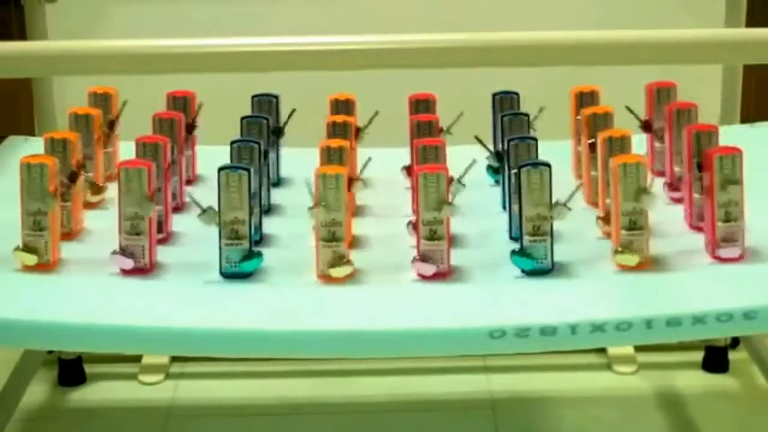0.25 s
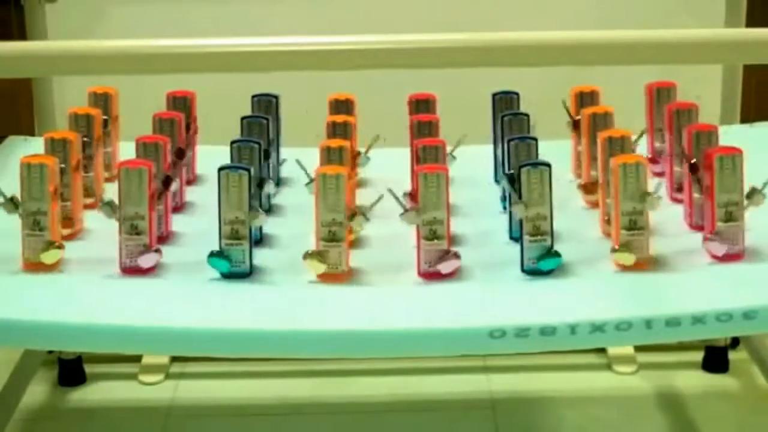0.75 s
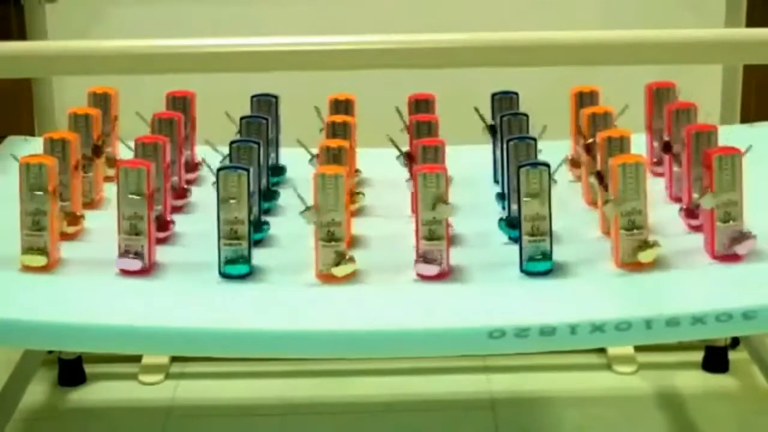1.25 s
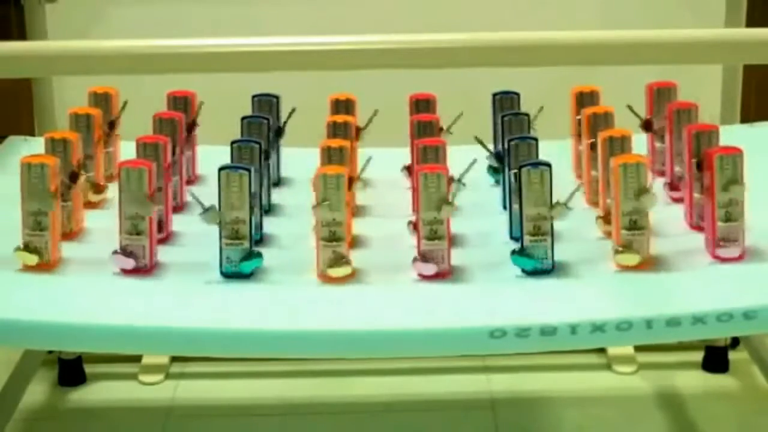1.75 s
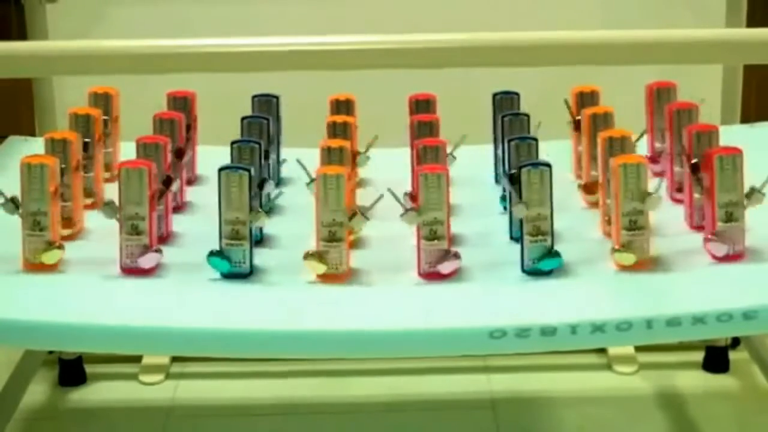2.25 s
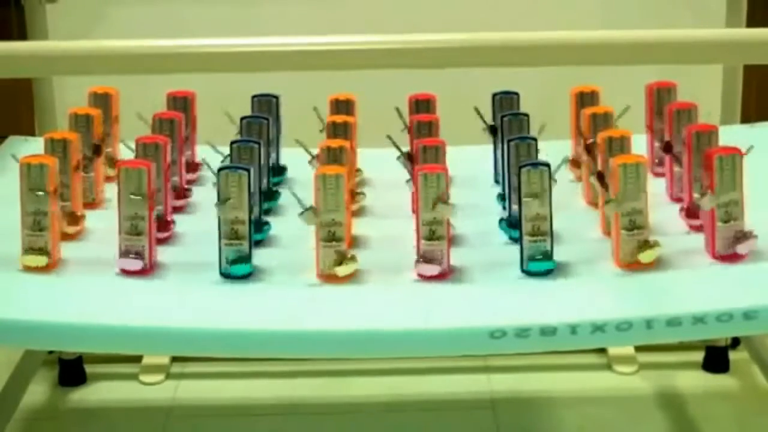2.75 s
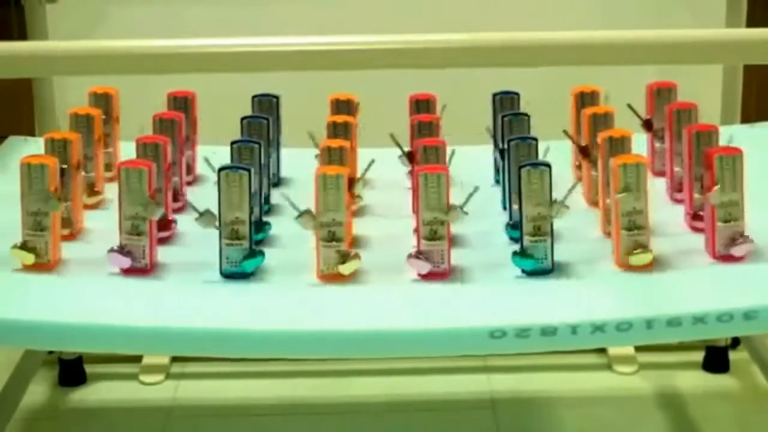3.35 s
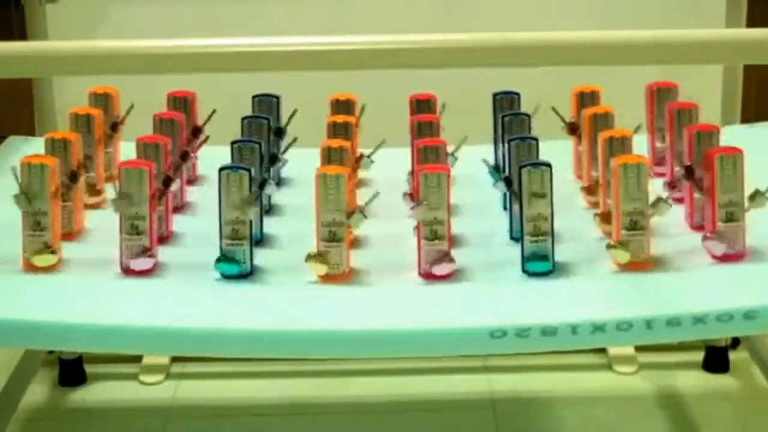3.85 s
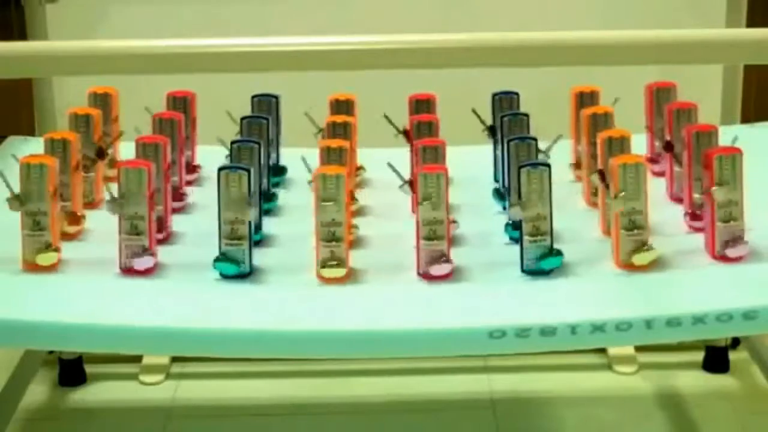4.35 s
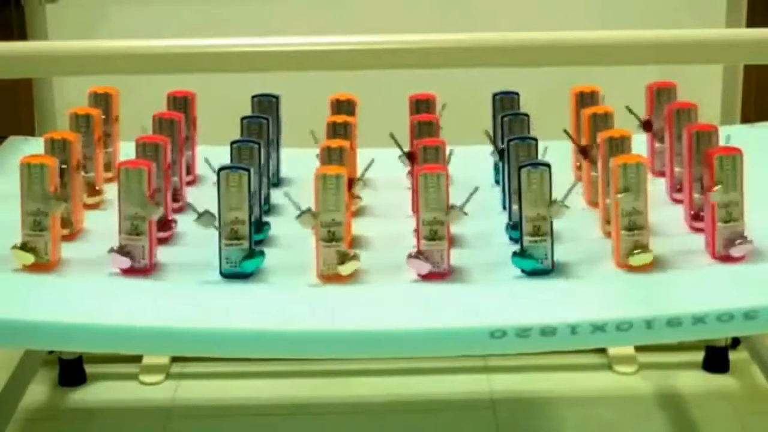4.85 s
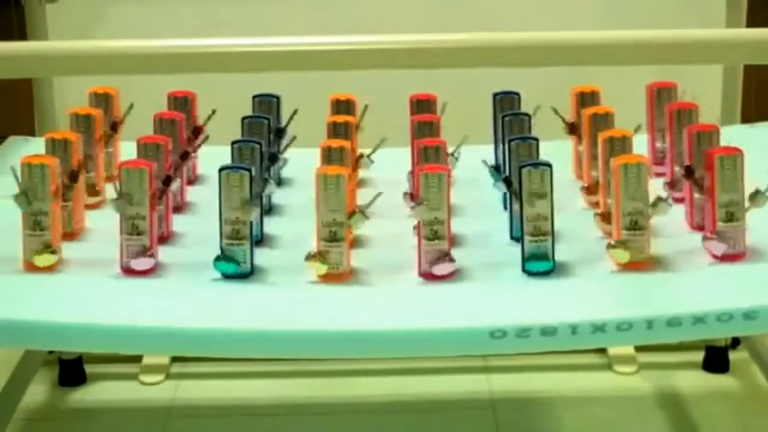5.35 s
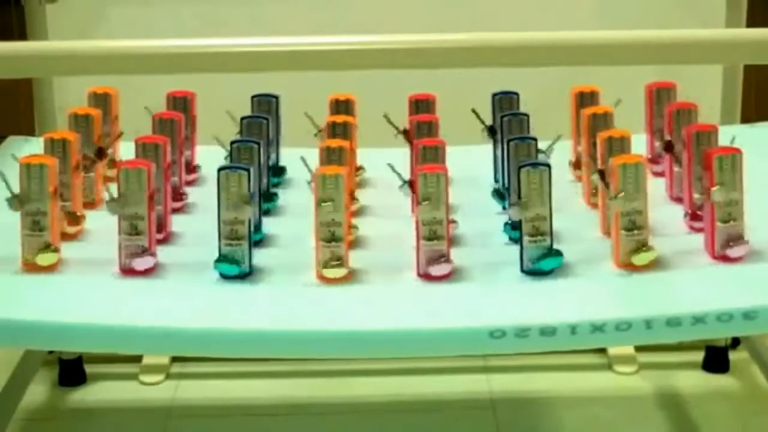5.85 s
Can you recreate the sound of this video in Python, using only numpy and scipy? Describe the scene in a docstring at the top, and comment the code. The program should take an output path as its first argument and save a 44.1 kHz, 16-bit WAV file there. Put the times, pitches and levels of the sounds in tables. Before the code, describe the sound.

From 0 s a dense clatter of thirty-two small clockwork metronomes is in full flow, and it continues unbroken to about 6 s. Each metronome strikes roughly every 0.38 s with a slight limp between tick and tock, but all are out of step, so some eighty-five ticks a second pile into an irregular rattle. Every tick is a dry, bright crack with a tiny rebound, a very short plastic ring near 1.9 kHz and a dull knock into the foam board. Louder ticks jump out at random; a few sound lower. Loose bunches slide and reshuffle throughout, never locking together. Beneath, the board hums hollowly around 200 to 600 Hz, its knocks swelling gently about every 0.38 s. Short small-room echoes fill the gaps. The stereo sound is close, mostly central, peak-limited, without deep bass or extreme treble.

```python
"""Thirty-two small clockwork metronomes tick out of step on a hanging foam board in a small room.
Each strikes twice a swing, with a slight limp: a sharp crack of filtered noise and clicks,
a short ring of the plastic case made of fading sines, and a dull knock of noise into the board.
Their rates differ slightly, so the ticks slide past each other in loose bunches.
The board hums along, the room adds short echoes, and a fast limiter holds down the peaks."""
import sys
import numpy as np
from scipy import signal
from scipy.fft import rfft, irfft
from scipy.io import wavfile
from scipy.ndimage import uniform_filter1d, minimum_filter1d

SR = 44100
rng = np.random.default_rng(int(sys.argv[2]) if len(sys.argv) > 2 else 0)


def store_pcm(level_fs):
    """Save levels as 16-bit WAV."""
    pcm = np.round(np.clip(level_fs, -1, 1) * 32767).astype(np.int16)
    wavfile.write(sys.argv[1], SR, np.atleast_2d(pcm).T)


N = 269872  # length in samples

# Overtones of a plastic case, before each pallet's own variation:
# (multiple of the case pitch [ratio], level_db, t60_s)
CASE_MODES = [(0.88, 1.5, 0.0067), (0.995, 0.5, 0.11), (1.028, 17.5, 0.013), (1.4, 3.5, 0.027),
              (1.658, 2, 0.034), (2.07, -5, 0.056)]
# One row for each metronome, which ticks and tocks once in every full swing:
# (first_tick_s, tock_after_tick_s, swing_period_s)
METRONOMES = [(.054, .372, .7502), (.0605, .391, .7526), (.0665, .371, .7562), (.1065, .3565, .7551),
              (.1135, .3675, .7507), (.116, .3895, .7555), (.1175, .3555, .7493), (.123, .359, .751),
              (.1475, .39, .7557), (.1545, .359, .7537), (.158, .3325, .7548), (.1615, .4165, .7513),
              (.1755, .3415, .7563), (.192, .332, .7587), (.195, .4025, .7514), (.207, .356, .75),
              (.2095, .344, .7524), (.2265, .4035, .7577), (.2295, .3735, .7518), (.2315, .383, .7475),
              (.2445, .345, .752), (.25, .4155, .7483), (.2875, .369, .7549), (.29, .38, .7489),
              (.2925, .342, .7495), (.3065, .363, .7458), (.336, .357, .7579), (.344, .3855, .7503),
              (.3485, .414, .7488), (.3635, .393, .7566), (.3815, .386, .7503), (.4125, .343, .7513)]


def undb(db):
    """Turn decibels into an amplitude factor."""
    return 10 ** (np.asarray(db) / 20)


def unit(x):
    """Scale to unit energy."""
    return x / np.sqrt(np.sum(x ** 2))


def fade(t, t60):
    """Free decay, 60 dB down after t60 seconds."""
    return np.exp(-np.log(1000) * t / t60)


def colour(x, points, size=2048):
    """Filter through (Hz, dB) points; the cepstrum gives a filter that never rings ahead of the sound."""
    hz, db = np.transpose(points)
    grid = np.maximum(np.fft.rfftfreq(size, 1 / SR), 1)
    log_gain = np.log(undb(np.interp(np.log(grid), np.log(hz), db)))
    cepstrum = irfft(log_gain)
    # fold the second half onto the first
    cepstrum[1:size // 2] *= 2
    cepstrum[size // 2 + 1:] = 0
    response = irfft(np.exp(rfft(cepstrum)))
    return signal.fftconvolve(x, response)[:len(x)]


def add(track, sound, s):
    """Mix a sound into a track at time s, cutting off what falls outside."""
    start = int(round(s * SR))
    a, b = max(start, 0), min(start + len(sound), len(track))
    if b > a:
        track[a:b] += sound[a - start:b - start]


def room(sound, split_hz=4000, size=12000):
    """Diffuse reflections from near walls as heard from one spot (mid and side); the treble dies sooner."""
    low_t60_s, treble_t60_s, wall_gap_s = 0.3, 0.13, 0.0041
    t = np.arange(size) / SR
    noise = rng.standard_normal((2, size))
    lowpass = signal.butter(1, split_hz, fs=SR, output="sos")
    low = signal.sosfilt(lowpass, noise)
    tail = low * fade(t, low_t60_s) + (noise - low) * fade(t, treble_t60_s)
    # the echo swells in after the direct sound
    response = tail * (1 - np.exp(-(t / wall_gap_s) ** 2))
    return [signal.fftconvolve(sound, unit(r)) for r in response]


def board_note(knocks):
    """The knocks keep the board's low modes humming."""
    # the board's own notes: (pitch_hz, level_db relative to the knocks, t60_s)
    board_modes = [(210, -21.3, 1.4), (416, -14.5, 0.66), (459, -13.5, 0.4), (578, -12, 0.12),
                   (667, -19.5, 0.25)]
    t = np.arange(SR) / SR
    out = np.zeros(N)
    for hz, db, t60 in board_modes:
        note = fade(t, t60) * np.cos(2 * np.pi * hz * t)
        hum = signal.fftconvolve(knocks, note)[:N]
        out += undb(db) * hum * knocks.std() / hum.std()
    return out


def sway_db(s):
    """The board sways with the mean beat: knocks land hardest once a beat, softest half a beat later."""
    depth_db, mean_beat_s, hardest_knock_s = 4.5, .376, .238
    return depth_db * np.cos(2 * np.pi * (s - hardest_knock_s) / mean_beat_s)


def knock(t, t60=0.064):
    """The blow passes through the feet into the board: a short burst of noise in the board's colour."""
    # colour of a knock into the board: (frequency_hz, level_db)
    board_colour = [(30, -31), (70, -19.5), (105, -26.5), (160, -13), (240, -11), (290, -17), (380, 3),
                    (650, 5), (800, -0.5), (1200, -2.5), (2000, -13)]
    burst = rng.standard_normal(len(t)) * fade(t, t60)
    return unit(colour(burst, board_colour))


def ring(t, pitch_hz, traits, spread=0.026, rise_s=0.00018):
    """The case swells and rings briefly; the traits vary its overtones, their strength and damping."""
    strength_scatter_db, decay_scatter_doublings = 2.5, 0.3
    # turn each column on its side, so that every mode gets a row of samples
    ratio, db, t60 = np.transpose(CASE_MODES)[:, :, None]
    tuning, strength, sustain = traits
    detune = 1 + spread * tuning * (ratio > 1.2)  # only the upper modes are mistuned
    own_t60 = t60 * 2 ** (decay_scatter_doublings * sustain)
    decay = undb(db + strength_scatter_db * strength) * fade(t, own_t60)
    modes = -decay * np.sin(2 * np.pi * pitch_hz * ratio * detune * t)
    return unit(modes.sum(axis=0) * (1 - np.exp(-t / rise_s)))


def crack(t, count=3):
    """The escape wheel hits its pallet, rebounds back and forth, each time weaker, and rattles out."""
    # colour of the escapement's crack: (frequency_hz, level_db)
    crack_colour = [(200, -22), (500, -32), (800, -60), (1200, -35.5), (1450, -8), (2000, 0), (2400, 2),
                    (2650, 0.5), (3250, 1), (3570, 0), (3950, 2.5), (4850, -3.5), (5200, -0.5), (5850, -1),
                    (6450, -5), (6850, -3), (7400, -4.5), (7900, -15.5), (8500, -10), (11500, -29.5)]
    rebound_s, rebound_db = .0008, -1.5  # typical gap, and change of level at each rebound
    rattle_db, rattle_rise_s, rattle_t60_s = 2.5, .0002, .018  # level relative to the first click
    envelope = fade(t, rattle_t60_s) * (1 - np.exp(-t / rattle_rise_s))
    blow = undb(rattle_db) * unit(rng.standard_normal(len(t)) * envelope)
    gaps = rebound_s * rng.uniform(.65, 1.2, count)
    for k, s in enumerate(np.cumsum(gaps) - gaps):
        click = (-1) ** k * undb([k * rebound_db])  # one sample, flipping sign each time
        add(blow, click, s)
    return unit(colour(blow, crack_colour))


def strikes(first, period, jitter_s=.0002):
    """Times at which one pallet is struck: once a swing, almost evenly."""
    swings = np.arange(-1, int(N / SR / period) + 1)
    return first + period * swings + jitter_s * rng.standard_normal(len(swings))


def beats(ring_scatter_db=1, pallet_detune=0.011):
    """All strikes as (s, ring dB, crack dB, pitch Hz, pallet); a clear tick takes over the nearest free beat."""
    # the ticks that stand out from the clatter: (start_s, level_db, case_pitch_hz)
    clear_ticks = [(0.0052, 2, 2010), (0.0151, 1, 1940), (0.0549, 1, 1860), (0.0677, -1, 1910),
                   (0.1069, 1, 1940), (0.1602, 4, 1900), (0.1943, -2, 1930), (0.2268, -3, 1880),
                   (0.2488, 5, 1870), (0.2898, 5, 1880), (0.3387, -1, 1900), (0.3461, 3, 1930),
                   (0.3638, 4, 1910), (0.3844, -1, 1870), (0.4123, 6, 2040), (0.4251, 1, 1860),
                   (0.4399, -1, 1850), (0.4525, -4, 1890), (0.4728, 0, 1830), (0.4827, 0, 1430),
                   (0.5055, 5, 1860), (0.5246, -1, 1860), (0.5541, 2, 1990), (0.5634, 3, 1880),
                   (0.5895, 4, 1920), (0.6027, 1, 1910), (0.631, -4, 1910), (0.6579, -2, 1880),
                   (0.6676, -1, 1970), (0.73, 3, 1890), (0.7559, 1, 1950), (0.8043, 3, 1900),
                   (0.8231, 1, 1940), (0.8636, 1, 1830), (0.9132, -3, 2110), (0.9801, -4, 1910),
                   (1.0408, 3, 1860), (1.0978, 5, 1890), (1.121, 6, 1930), (1.1622, -2, 1960),
                   (1.1663, 2, 1960), (1.1759, 3, 1880), (1.1968, 0, 1950), (1.2326, -4, 1430),
                   (1.2614, 6, 1860), (1.3055, 0, 1980), (1.3129, 2, 1950), (1.3431, -1, 1960),
                   (1.3497, -2, 1930), (1.4116, -4, 2010), (1.4168, 0, 1880), (1.4803, 0, 1910),
                   (1.5064, -4, 1970), (1.5551, 4, 1870), (1.5792, -2, 2020), (1.6156, 3, 1860),
                   (1.6597, -3, 1900), (1.6667, 3, 1860), (1.6986, 0, 1830), (1.7154, -4, 1880),
                   (1.7432, -1, 1910), (1.7894, 4, 1840), (1.8465, 4, 1940), (1.8762, 4, 1950),
                   (1.9163, 5, 2040), (1.9276, -3, 1970), (1.952, -1, 1830), (1.9734, -4, 1830),
                   (1.9824, 0, 1430), (1.9998, -4, 1930), (2.0171, -2, 1970), (2.03, 5, 1860),
                   (2.049, 0, 1840), (2.0591, 2, 1900), (2.0809, 1, 1890), (2.0955, 2, 1900),
                   (2.1034, 1, 1830), (2.1335, 2, 1880), (2.1657, 2, 1870), (2.2079, -4, 1930),
                   (2.2305, 4, 1950), (2.2588, 0, 1930), (2.2689, 1, 1930), (2.3054, 1, 1850),
                   (2.3354, 0, 1890), (2.3657, -2, 1830), (2.3739, 0, 1430), (2.4162, 1, 1850),
                   (2.4493, 2, 1880), (2.4572, 0, 1850), (2.4852, 0, 1900), (2.5008, -2, 1900),
                   (2.5373, -1, 1870), (2.5544, -2, 1850), (2.5962, 1, 1930), (2.6079, -4, 1920),
                   (2.6329, 5, 1920), (2.6674, 2, 1970), (2.6789, 2, 1860), (2.7067, -3, 2020),
                   (2.7222, 0, 1430), (2.7319, 0, 1430), (2.7548, -4, 1900), (2.7722, -1, 2030),
                   (2.783, 1, 1840), (2.8114, 1, 1870), (2.847, 1, 1860), (2.883, -2, 1880),
                   (2.9658, -2, 1920), (2.9801, 1, 2000), (3.0093, 2, 1840), (3.0184, 2, 1950),
                   (3.0289, 0, 2010), (3.0555, 4, 1910), (3.0927, -3, 1940), (3.1157, -1, 1830),
                   (3.1266, 2, 2030), (3.138, -3, 1930), (3.1684, 3, 1880), (3.2012, -1, 1880),
                   (3.2194, 0, 1850), (3.2855, -2, 1900), (3.2908, 3, 1840), (3.3075, 0, 1900),
                   (3.3435, 1, 1970), (3.3926, 0, 1930), (3.4171, -1, 1990), (3.4211, 0, 1920),
                   (3.429, -2, 1950), (3.463, -4, 1860), (3.4838, 0, 1430), (3.5293, 0, 1920),
                   (3.5616, 2, 1940), (3.5977, 1, 1950), (3.6323, -3, 1900), (3.7247, -1, 1930),
                   (3.7304, 1, 2020), (3.7583, -3, 1830), (3.7688, 2, 1980), (3.7844, 1, 1980),
                   (3.8056, 5, 1850), (3.8246, -4, 1860), (3.8493, 1, 1890), (3.866, 2, 1830),
                   (3.8793, 0, 1430), (3.9193, 2, 2080), (3.9884, 1, 1900), (4.0045, -3, 1940),
                   (4.0151, 0, 1880), (4.0348, 1, 1880), (4.0622, 1, 1880), (4.0942, 3, 2000),
                   (4.1258, -3, 1920), (4.1507, 1, 1980), (4.1686, 2, 2000), (4.2197, 0, 1960),
                   (4.2347, 0, 1430), (4.2662, -3, 1880), (4.2834, 3, 2100), (4.349, 0, 1910),
                   (4.4083, -3, 1830), (4.4825, 5, 1930), (4.5068, -2, 1840), (4.5198, 4, 1930),
                   (4.54, 2, 1940), (4.555, -2, 1860), (4.5764, -4, 1880), (4.6047, 0, 1910),
                   (4.6149, -4, 1920), (4.6283, -2, 1430), (4.6369, -4, 1960), (4.6498, 1, 1870),
                   (4.6704, 1, 1960), (4.6769, -1, 1910), (4.6872, -2, 1940), (4.7209, 0, 1850),
                   (4.7406, 4, 1870), (4.7839, -3, 1830), (4.8173, -1, 1860), (4.8464, -2, 1930),
                   (4.8841, 3, 1940), (4.9061, 4, 1950), (4.9215, 5, 2120), (4.9276, -1, 1930),
                   (4.9669, -1, 1830), (4.9751, -3, 1830), (4.9847, -2, 1430), (5.0205, 1, 1870),
                   (5.0353, 4, 2000), (5.0639, -1, 1980), (5.0863, -4, 1900), (5.1034, 2, 1840),
                   (5.1444, 0, 1880), (5.156, -3, 1860), (5.1641, -1, 1850), (5.1871, 0, 1880),
                   (5.2339, 4, 1970), (5.2417, -3, 1900), (5.2561, -4, 2060), (5.2652, 0, 1840),
                   (5.2717, 1, 1940), (5.2966, 2, 1930), (5.3055, 2, 1900), (5.3609, 1, 2020),
                   (5.3782, 1, 1430), (5.3922, 2, 1970), (5.4043, 3, 1880), (5.4205, 0, 1980),
                   (5.4312, 3, 1830), (5.4406, 0, 1860), (5.4617, 0, 1890), (5.4901, 5, 1970),
                   (5.528, 0, 1910), (5.574, -4, 1870), (5.5954, 5, 1930), (5.6349, -2, 1840),
                   (5.6592, 3, 1910), (5.6718, 0, 2060), (5.7188, -3, 1850), (5.731, -2, 1910),
                   (5.774, -3, 1880), (5.783, -2, 1920), (5.7884, 0, 1990), (5.812, 2, 2020),
                   (5.8477, -1, 2100), (5.8638, 2, 1850), (5.8814, -2, 1880), (5.9039, 1, 1880),
                   (5.9444, -2, 1860), (5.9829, 0, 1970), (6.0139, 2, 1920), (6.019, 5, 1910),
                   (6.0528, -2, 1990), (6.0822, -3, 1870)]
    case_hz, other_db, other_scatter_db = 1880, -5.5, 2  # the ticks within the clatter
    low_case_hz, low_case_db = 1700, -5  # clear ticks pitched below this ring more weakly
    rows = []
    for number, (first, tock_s, period) in enumerate(METRONOMES):
        for half, start in enumerate((first, first + tock_s)):
            own_hz = case_hz * (1 + pallet_detune * rng.standard_normal())
            for s in strikes(start, period):
                db = other_db + other_scatter_db * rng.standard_normal()
                rows.append((s, db, db, own_hz, 2 * number + half))
    rows = np.array(rows)
    free = np.ones(len(rows), bool)
    for s, db, hz in clear_ticks:
        k = np.argmin(np.where(free, np.abs(rows[:, 0] - s), np.inf))
        ring_db = db + ring_scatter_db * rng.standard_normal() + low_case_db * (hz < low_case_hz)
        rows[k, :4] = s, ring_db, db, hz
        free[k] = False
    return rows


def metronomes(knock_scatter_db=2.5, variety=0.5, spacing=0.97):
    """Every pallet repeats its own tick and echo, the tick varying a little; returns mid, side and knocks."""
    direct_ring_db, direct_crack_db, direct_knock_db = 11.5, 12, -4
    echo_ring_db, echo_crack_db, echo_knock_db = -0.3, 5.8, -1
    echo_share = 0.6  # loud and soft ticks differ less in the echo than close up
    t = np.arange(3072) / SR
    mid, side, knocks = np.zeros((3, N))
    places = spacing * rng.permutation(np.linspace(-1, 1, len(METRONOMES)))  # across the board
    rows = beats()
    for pallet, place in enumerate(np.repeat(places, 2)):
        # tick and tock each have a voice of their own
        own = rows[rows[:, 4] == pallet, :4]
        traits = rng.standard_normal((3, len(CASE_MODES), 1))
        own_crack, own_knock = crack(t), knock(t)
        own_ring = ring(t, np.mean(own[:, 3]), traits)
        echo_source = undb(echo_crack_db) * own_crack + undb(echo_ring_db) * own_ring
        echo_source = echo_source + undb(echo_knock_db) * own_knock
        echo_mid, echo_side = room(echo_source)
        for s, ring_db, crack_db, pitch_hz in own:
            # a new tooth of the wheel strikes each time
            new_crack = unit(own_crack + variety * crack(t))
            tick = undb(direct_ring_db + ring_db) * ring(t, pitch_hz, traits)
            tick = tick + undb(direct_crack_db + crack_db) * new_crack
            echo_gain = undb(echo_share * crack_db)
            add(mid, tick, s)
            add(mid, echo_gain * echo_mid, s)
            add(side, place * tick, s)
            add(side, echo_gain * echo_side, s)
            knock_db = direct_knock_db + sway_db(s) + knock_scatter_db * rng.standard_normal()
            add(knocks, undb(knock_db) * own_knock, s)
    return mid, side, knocks


def scene():
    """Ticks and board in front, the room around them; how wide it sounds depends on the frequency."""
    # stereo width, as a filter on the side signal: (frequency_hz, gain_db)
    width = [(60, -1), (190, -6.5), (500, -18), (1900, -12.5), (3500, -15.5), (6000, -5.5), (7300, -4.5),
             (8300, 8), (11000, -4.5)]
    mid, side, knocks = metronomes()
    mid = mid + knocks + board_note(knocks)
    side = colour(side, width)
    return np.array([mid + side, mid - side])


def record(dry, ceiling=0.87, hold_s=0.001, low_cut_hz=80, top_hz=11200):
    """A fast limiter turns down the loudest peaks in both channels alike; then bass and top are cut."""
    size = max(int(hold_s * SR), 2)
    peak = np.abs(dry).max(axis=0)
    needed = np.minimum(1, ceiling / (peak + 1e-9))
    gain = minimum_filter1d(needed, size)
    # smooth twice, so that the gain glides
    gain = uniform_filter1d(uniform_filter1d(gain, size // 2), size // 2)
    bass_cut = signal.butter(2, low_cut_hz, "high", fs=SR, output="sos")
    top_cut = signal.ellip(8, .1, 80, top_hz, fs=SR, output="sos")
    return signal.sosfiltfilt(top_cut, signal.sosfilt(bass_cut, dry * gain))


dry = scene()
out = record(dry)
store_pcm(out)
```